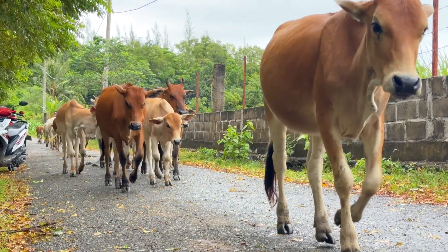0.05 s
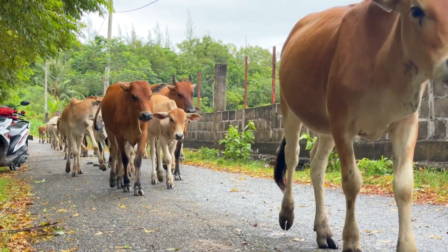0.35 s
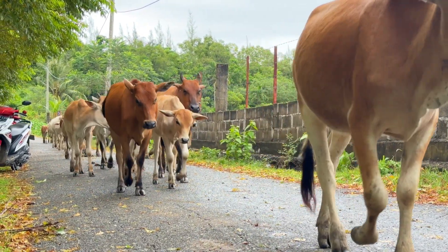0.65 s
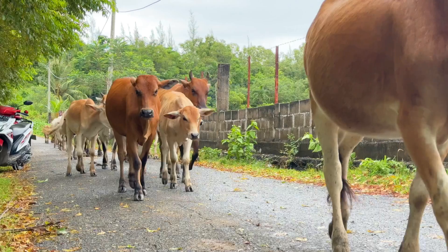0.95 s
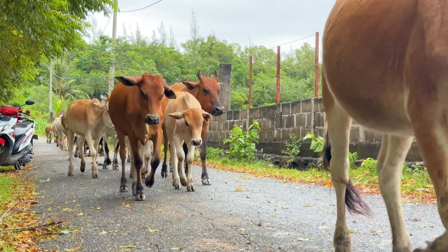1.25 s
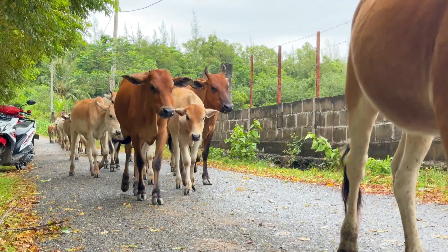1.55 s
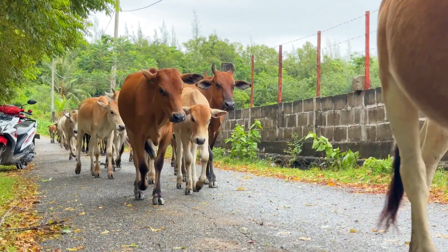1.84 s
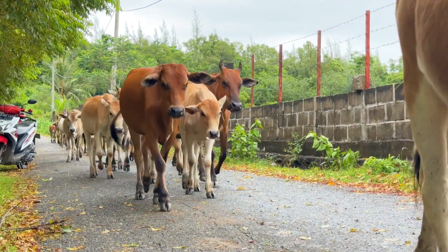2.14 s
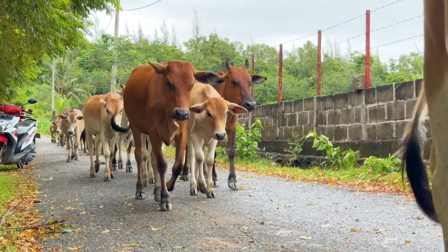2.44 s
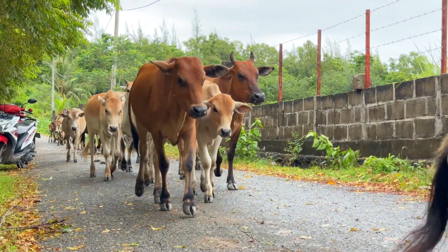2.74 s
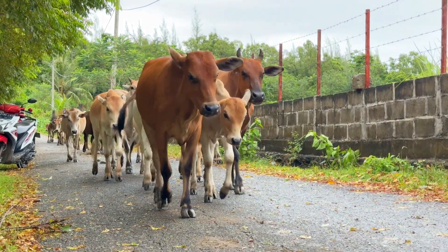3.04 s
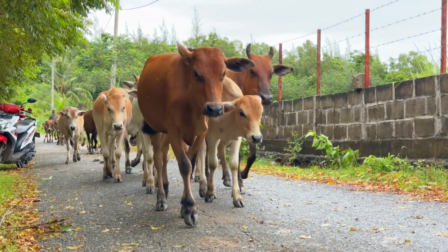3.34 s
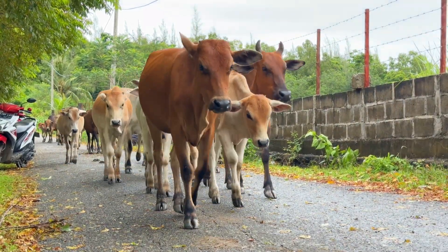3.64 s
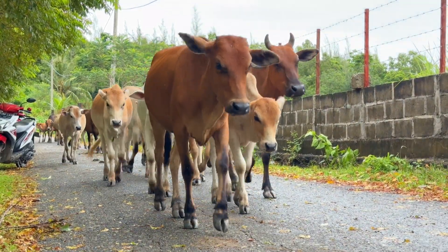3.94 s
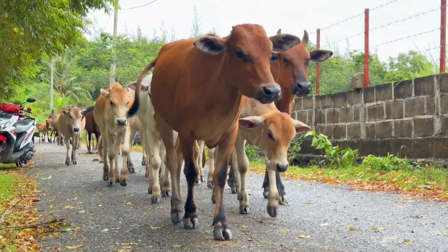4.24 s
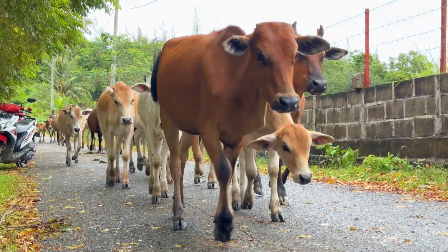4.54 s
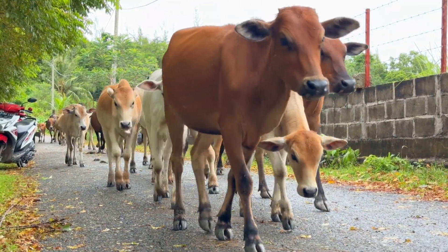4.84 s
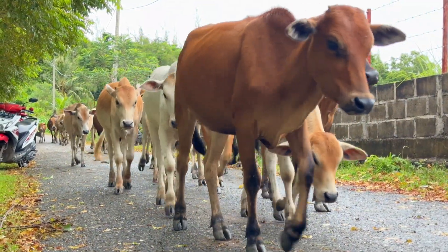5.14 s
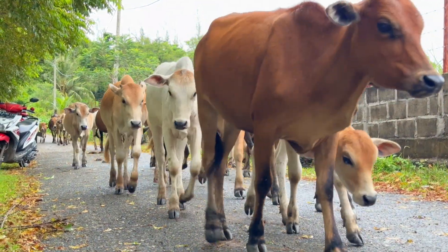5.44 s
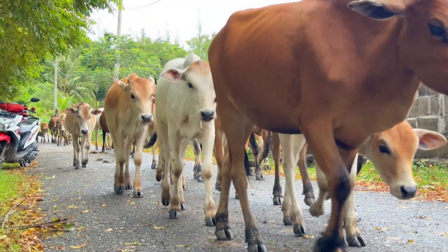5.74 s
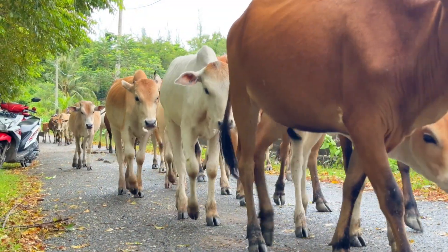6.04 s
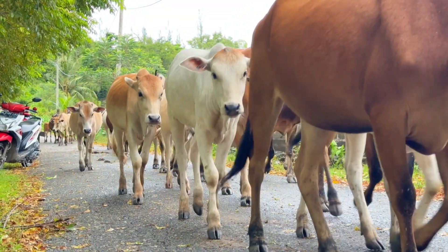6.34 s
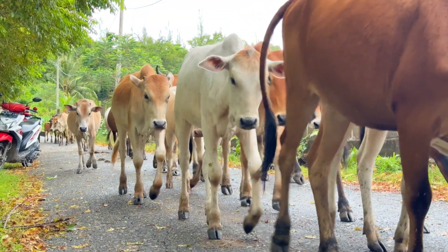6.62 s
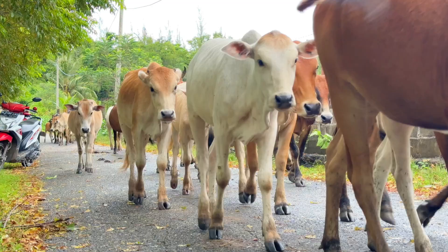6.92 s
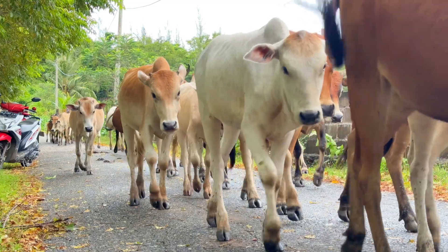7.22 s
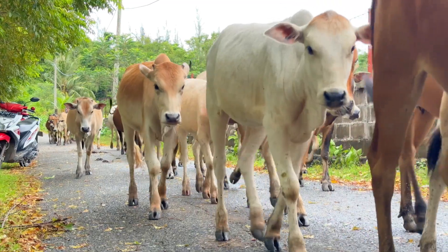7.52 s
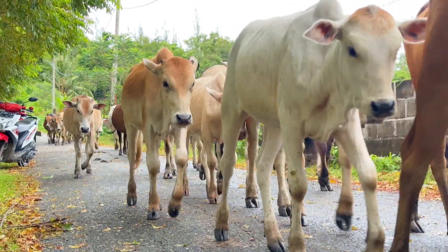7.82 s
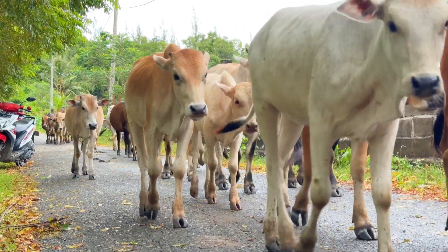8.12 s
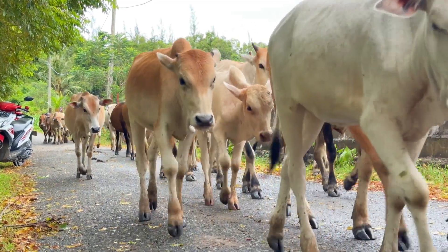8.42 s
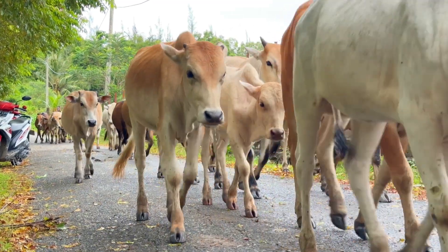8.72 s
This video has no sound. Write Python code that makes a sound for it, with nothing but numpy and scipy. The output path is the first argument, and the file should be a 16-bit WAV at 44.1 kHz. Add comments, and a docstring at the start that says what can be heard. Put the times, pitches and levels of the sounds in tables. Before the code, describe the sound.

A low moo and a brighter bawl from cattle, followed by high birdsong and faint hoofsteps outdoors.

```python
"""A country road between trees and a wall, heard from a stereo pair of microphones as cattle walk along.
Over low rumble and shuffled grit, a moo just to the right sinks from a hum to a growl while birds whistle.
A second moo opens into a bright bawl and ends in creaks; both are vocal folds ringing a changing throat.
Distant whistles, a thin trill and a low warble then carry through the echoing trees, and hooves tap softly.
Near the end a bird sings on the right and a cluster of steps knocks on the asphalt."""
import sys
import numpy as np
from scipy import signal
from scipy.fft import rfft, irfft
from scipy.io import wavfile
from scipy.ndimage import uniform_filter1d

SR = 44100
rng = np.random.default_rng(int(sys.argv[2]) if len(sys.argv) > 2 else 0)


def transcribe(signal):
    """Save signal, clipped to [-1, 1], as a 16-bit WAV file at the path in sys.argv[1]."""
    frames = np.atleast_2d(signal).T
    limited = np.clip(frames, -1, 1)
    pcm = np.round(limited * 32767).astype(np.int16)
    wavfile.write(sys.argv[1], SR, pcm)


N = 386757


def gain_of(db):
    """Decibels to amplitude."""
    return 10 ** (np.asarray(db) / 20)


def unit_rms(x):
    """Scales to rms 1."""
    return x / np.sqrt(np.mean(x ** 2) + 1e-20)


def spectrum_at(points, hz):
    """Reads a spectrum on a log-frequency axis."""
    f, value = np.transpose(points)
    return np.interp(np.log(hz + 1), np.log(f + 1), value)


def curves(rows, t):
    """Reads every column of a table at the times t."""
    s, *columns = np.transpose(rows)
    return [np.interp(t, s, c) for c in columns]


def add(mix, s, sound):
    """Adds a sound into the mix at time s."""
    part = mix[..., max(round(s * SR), 0):][..., :sound.shape[-1]]
    part += sound[..., :part.shape[-1]]


def wander(n, hz):
    """Smooth random drift of rms about 1, moving up to about hz times a second."""
    f = np.fft.rfftfreq(n + SR, 1 / SR)
    return unit_rms(irfft(rfft(rng.standard_normal(n + SR)) / (1 + (f / hz) ** 4)))[:n]


def ring(modes, size=8192):
    """Causal impulse response of a set of steep resonances."""
    f = np.fft.rfftfreq(size, 1 / SR)
    power = sum((gain_of(db) / (1 + (2 * (f - hz) / width) ** 2)) ** 2 for hz, width, db in modes)
    log_gain = np.log(power + 1e-10) / 2
    minimum_phase = np.exp(np.conj(signal.hilbert(np.r_[log_gain, log_gain[-2:0:-1]])))
    return np.fft.ifft(minimum_phase).real[:size // 4]


# Open air all round the microphones. Each row: frequency in Hz, relative spectral level in dB.
AIR_SPECTRUM = [(12, -45), (28, -23), (45, -8), (70, 1.5), (130, -4.5), (200, -12), (350, -20.5),
                (700, -24), (1400, -26.5), (2800, -28.5), (5500, -35), (8000, -40), (10000, -41),
                (15000, -48)]
# Each row: frequency in Hz, correlation between the left and right microphones.
AIR_LIKENESS = [(60, 1), (120, .96), (240, 0.65), (900, 0.68), (2000, .3), (4000, 0.18), (8000, -0.14)]

def air(db=-50.5, patchy_db=1.5, swell_db=-.04):
    """Low outdoor rumble and leaf hiss, drifting in patches."""
    frames, hz = N // 512 + 6, np.fft.rfftfreq(2048, 1 / SR)
    a, b, c, d, patches = rng.standard_normal((5, frames, len(hz)))
    patches = unit_rms(uniform_filter1d(uniform_filter1d(patches, size=8, axis=0), size=16, axis=1))
    likeness = spectrum_at(AIR_LIKENESS, hz)
    left = a + 1j * b
    right = likeness * left + np.sqrt(1 - likeness ** 2) * (c + 1j * d)
    gain = gain_of(spectrum_at(AIR_SPECTRUM, hz) + patchy_db * patches)
    spectra = np.array([left, right]) * gain / np.sqrt((1 + likeness) / 2 + 1e-3)
    noise = signal.istft(spectra.swapaxes(1, 2), nperseg=2048, noverlap=1536)[1][:, :N]
    return gain_of(db + swell_db * wander(N, .67)) * unit_rms(noise)


# Loose grit on the road. Each row: resonance in Hz, width in Hz, gain in dB.
GRIT_MODES = [(4000, 4500, -15.5), (9500, 7700, 8), (12900, 3100, 1.5)]

def scuffs(db=-75, nearing_db_per_s=.5, grains_per_s=700):
    """Many shuffling feet roll loose grit in clumps, louder as the herd nears the microphones."""
    t = np.arange(N) / SR
    clumps = gain_of(5 * np.minimum(wander(N, 9), 1.8))
    grains = (rng.random((2, N)) < grains_per_s / SR) * rng.standard_normal((2, N)) * clumps
    grit = signal.fftconvolve(grains, ring(GRIT_MODES)[None], axes=1)[:, :N]
    return gain_of(db + nearing_db_per_s * (t - t.mean())) * unit_rms(grit)


def moo(course, texture, mouth, jitter, slip_turns, flutter_hz, chest_db,
        shimmer=.6, smear_rad=.025, attack_s=.006, release_s=.015):
    """Pulses of the vocal folds and puffs of air ring a throat that changes posture."""
    t = np.arange(course[0][0], course[-1][0], 1 / SR)
    hz, db = curves(course, t)
    rough, flutter, hiss, reach_hz = curves(texture, t)
    sway = 2 * np.pi * flutter_hz * t + 1.5 * wander(len(t), 15)  # loose tissue flaps beside the folds
    turns = np.cumsum(hz * (1 + jitter * rough * wander(len(t), 61) + .044 * flutter * np.cos(sway))) / SR
    turns += slip_turns * rough * wander(len(t), 90)  # each closure comes a little early or late
    # soft folds close unevenly, so higher harmonics arrive later; above their reach only air is left
    folds = sum(np.cos(2 * np.pi * k * turns - smear_rad * k ** 2) / (1 + (k * hz / reach_hz) ** 8)
                for k in range(1, 56)) / 4
    folds *= np.exp(shimmer * rough * wander(len(t), 100)) * (1 + flutter * np.sin(sway))
    puffs = unit_rms((.7 + np.exp(-(turns % 1) / .25)) * rng.standard_normal(len(t)))
    drive = folds + hiss * puffs
    held_s = [s for start, end, _ in mouth for s in (start, end)]
    voice = 0
    for k, (_, _, throat) in enumerate(mouth):
        share = np.interp(t, held_s, np.repeat(np.arange(len(mouth)) == k, 2))
        voice += share * unit_rms(signal.fftconvolve(drive, ring(throat))[:len(t)])
    voice /= np.sqrt(uniform_filter1d(uniform_filter1d(voice ** 2, size=1100), size=700) + 1e-9)
    # the fundamental leaves through the neck
    voice += gain_of(chest_db) * (hz / hz.max()) ** 4 * np.sin(2 * np.pi * turns)
    gate = np.clip(np.minimum((t - t[0]) / attack_s, (t[-1] - t) / release_s), 0, 1)
    out = np.zeros(N)
    add(out, t[0], gate * gain_of(db) * voice)
    return out


# The throat in four postures. Each row: resonance in Hz, width in Hz, gain in dB.
HUM = [(293, 60.6, 1.5), (657, 148, -9), (940, 150, -12), (1137, 60, -5), (1350, 200, -20),
       (1680, 290, -25), (2164, 570, -28), (4000, 3100, -44), (11000, 4800, -46)]
STRAINED = [(293, 60, 1.5), (640, 148, -8), (935, 130, -12), (1170, 220, -15), (1410, 130, -10),
            (1600, 200, -22), (2200, 650, -24), (4000, 3100, -43), (11000, 4800, -46)]
GROWL = [(250, 62, 2), (654, 114, -2), (950, 240, -18), (1251, 136, -9.5), (1590, 170, -16.5),
         (1960, 157, -19), (2490, 400, -30), (3800, 4500, -42)]
AGAPE = [(240, 65, 0), (605, 130, 0), (965, 150, -9), (1250, 130, -4), (1530, 200, -10), (1920, 150, -10),
         (2500, 500, -22), (3800, 3100, -42)]
# Each row: start and end in seconds, posture held.
FIRST_MOUTH = [(0, .17, HUM), (.34, .455, STRAINED), (.505, .57, GROWL), (.615, .67, AGAPE),
               (.72, .85, GROWL)]
# Each row: time in seconds, pitch in Hz, effort in dB.
FIRST_COURSE = [(0.0, 164.4, -22), (0.098, 160.8, -22), (0.228, 160.4, -20), (0.336, 158.6, -20),
                (0.448, 149.4, -19), (0.48, 142.6, -17), (0.582, 126.3, -20), (0.646, 111.4, -23),
                (0.704, 92.0, -21), (0.735, 87.8, -22), (0.755, 86, -31), (0.78, 80, -31), (0.792, 78, -42),
                (0.835, 72, -47)]
# The folds turn rough as they start, strain and slacken. Each row: time in seconds,
# roughness and flutter depth from 0 to 1, strength of rushing air, reach of the harmonics in Hz.
FIRST_FOLDS = [(0, 1, .5, 2.6, 1300), (.035, 1, .5, 2.4, 1300), (.06, .12, .08, .55, 2000),
               (.3, .11, .08, .55, 2300), (.4, .25, .2, .85, 2200), (.49, .09, 0, .35, 1900),
               (.57, .1, 0, .4, 2100), (.7, .25, .1, .7, 3000), (.835, .7, .3, .9, 900)]

def first_moo():
    """A hum sinks to a growl as the folds slacken."""
    return moo(FIRST_COURSE, FIRST_FOLDS, FIRST_MOUTH,
               jitter=.035, slip_turns=.05, flutter_hz=46, chest_db=-8.5)


# The trees along the road. Each row: frequency in Hz, seconds to die away by 60 dB.
TREE_DECAY = [(200, 0.25), (1500, 0.28), (3500, 1), (5500, 0.72), (8000, 0.5), (14000, 0.45)]

def echoes(x, early_db, early_s, late_db):
    """Scatter from the wall and nearby leaves, then a longer tail from the trees."""
    t = np.arange(SR) / SR
    taps = rng.standard_normal((2, SR)) * (rng.random((2, SR)) < .08) * (t > .005)
    hz, frame_s, spectra = signal.stft(taps, SR, nperseg=256)
    decay = gain_of(-60 * frame_s / spectrum_at(TREE_DECAY, hz)[:, None])
    late = signal.istft(spectra * decay, SR, nperseg=256)[1][:, :SR]
    early = rng.standard_normal((2, SR)) * (rng.random((2, SR)) < .03) * (t > .003) * np.exp(-t / early_s)
    tail = (gain_of(early_db) * unit_rms(early) + gain_of(late_db) * unit_rms(late)) / np.sqrt(SR)
    return signal.fftconvolve(x[None], tail, axes=1)[:, :N]


# The moos at the microphones. Each row: frequency in Hz, left minus right level in dB.
MOO_BALANCE = [(60, -17), (120, -4), (370, -5.5), (690, -8.5), (1260, -14), (2330, -15), (4300, -8.5),
               (9000, -9.5)]

def cattle(voices):
    """Sets the voices a little to the right, with a faint slap from the roadside."""
    hz = np.fft.rfftfreq(N, 1 / SR)
    side = gain_of(spectrum_at(MOO_BALANCE, hz))
    left = side * np.exp(1j * np.minimum(hz / 2800, 3))
    pair = np.array([left, np.ones(len(hz))]) * 2 / (1 + side)
    return irfft(rfft(voices) * pair, N) + echoes(voices, early_db=-14, early_s=.016, late_db=-36)


def whistle(length_s, start_hz, middle_hz, end_hz, change_db, waver, flicker=3.1, attack_s=.006):
    """One unsteady glide of the syrinx, never twice quite alike, as an analytic signal."""
    u = np.linspace(0, 1, int(length_s * SR))
    bend, tremor = uniform_filter1d(uniform_filter1d(rng.standard_normal((2, len(u))), size=90), size=60)
    glide_hz = np.polyval(np.polyfit([0, .5, 1], [start_hz, middle_hz, end_hz], 2), u)
    hz = glide_hz * (1 + waver * bend + .003 * rng.standard_normal())
    gate = np.sin(np.pi / 2 * np.clip(np.minimum(u * length_s / attack_s, (1 - u) / .3), 0, 1)) ** 2
    strength = gate * gain_of(change_db * (u - .5)) * np.exp(flicker * tremor)
    return strength * np.exp(2j * np.pi * np.cumsum(hz) / SR)


def leaves(sound):
    """Leaves round the perch blur every note in a different way."""
    t = np.arange(1200) / SR
    taps = .6 * unit_rms(rng.standard_normal(len(t)) * np.exp(-t / .012)) / np.sqrt(len(t))
    blurred = signal.fftconvolve(sound, taps + (t == 0))
    return blurred * np.linalg.norm(sound) / np.linalg.norm(blurred)


# Bird syllables. Each holds: length in seconds, start, middle and end pitch in Hz, level change in dB.
SWOOP = (.052, 4750, 5800, 7150, 2)
PEEP = (.075, 6900, 6960, 6900, -2)
TICK = (.025, 5600, 4600, 4000, 2)
SEEP = (.18, 7366, 7046, 7140, -5)
SLUR = (.076, 5480, 4980, 3650, 7)
LIFT = (.036, 5650, 6350, 6600, 5)
TINK = (.026, 6300, 6020, 5650, 2)
CHIP = (.031, 4980, 4780, 3920, 1)
PIP = (.04, 5220, 5130, 5100, -3)
TOO = (.04, 4400, 4440, 4620, 10)
WHIT = (.036, 4680, 5150, 6200, 0)
DROP = (.045, 4650, 4080, 3850, 0)
CHEW = (.058, 6080, 4480, 3930, -5)
TSEE = (.1, 8050, 7650, 7400, 0)
ZEE = (.09, 6800, 6740, 6700, 5)
ZIP = (.045, 6390, 6500, 6700, 0)
SINK = (.13, 8600, 8400, 7400, -20)
WHEEP = (.1, 3000, 3480, 3850, 9)
COO = (.105, 1990, 1965, 2090, 2)
PEW = (.23, 2610, 2480, 2244, 0)
MOAN = (.13, 980, 945, 880, 0)
HOO = (.16, 3005, 2900, 3080, 0)

def birds(notes, left_db, early_db, late_db, waver=.06, left_lead_rad=-2.24, direct_db=.5, early_s=.042):
    """Notes reach the two microphones directly and scattered by the trees."""
    song = np.zeros(N, complex)
    for syllable, s, db in notes:
        add(song, s, gain_of(db) * leaves(whistle(*syllable, waver)))
    side = gain_of(left_db)
    direct = np.array([song * side * np.exp(1j * left_lead_rad), song]).real * np.sqrt(2 / (1 + side ** 2))
    return gain_of(direct_db) * direct + echoes(song.real, early_db, early_s, late_db)


# Each row: syllable, start in seconds, relative level in dB.
NEAR_CALLS = [(SEEP, 0, -36), (PEEP, 0, -33), (SEEP, .62, -29), (SINK, 5.236, -48), (SINK, 5.422, -50),
              (DROP, 6.02, -52), (DROP, 6.47, -55), (TSEE, 6.6, -47), (ZEE, 7.168, -29.5),
              (TSEE, 8.36, -50), (TICK, 8.416, -28), (ZEE, 8.678, -26), (ZIP, 8.721, -23)]

def near_calls():
    """Single high calls from the nearby trees, almost straight ahead."""
    return birds(NEAR_CALLS, left_db=-2, early_db=-3, late_db=-7, waver=.08)


def phrase(runs):
    """Each syllable repeats at an even pace while it swells or fades."""
    return [(syllable, first_s + k * gap_s, db)
            for syllable, first_s, count, gap_s, first_db, last_db in runs
            for k, db in enumerate(np.linspace(first_db, last_db, count))]


# Each row: syllable, start in seconds, note count, spacing in seconds, first and last relative level in dB.
SWOOPING_RUNS = [(SWOOP, .068, 3, .204, -24, -24), (PEEP, .114, 3, .204, -22, -24),
                 (TICK, .017, 9, .0623, -27, -23.5)]

def swooping_bird():
    """Upward swoops, peeps and quick ticks, close by and just left of centre."""
    return birds(phrase(SWOOPING_RUNS), left_db=2, early_db=-4, late_db=-6)


# Each row: syllable, start in seconds, note count, spacing in seconds, first and last relative level in dB.
SEESAW_RUNS = [(SLUR, .866, 1, 0, -18, -18), (LIFT, .964, 5, .1305, -30, -23),
               (TINK, 1.0, 5, .1305, -20, -19), (CHIP, 1.026, 4, .1295, -15, -17),
               (PIP, 1.426, 2, .116, -26, -21)]

def seesaw_bird():
    """Rising and falling notes alternate, close by on the right."""
    return birds(phrase(SEESAW_RUNS), left_db=-5, early_db=-6.5, late_db=-9, direct_db=1)


# The throat as the mouth opens and shuts. Each row: resonance in Hz, width in Hz, gain in dB.
NASAL = [(165, 100, 0), (365, 110, -1), (775, 130, 1.5), (1080, 400, -7), (1950, 500, -17),
         (2425, 170, -7.5), (3310, 1100, -14)]
PARTING = [(140, 150, -7), (345, 77, 2), (700, 80, 1.5), (980, 420, -8), (1800, 700, -19), (2500, 170, -10),
           (3500, 1000, -16)]
OPEN = [(375, 79, -2), (804, 95, -10), (1057, 180, -12.5), (1290, 240, -21.5), (1632, 80, -4),
        (1780, 260, -13), (2082, 120, -8), (2870, 110, -14), (3450, 610, -20), (4700, 1200, -32),
        (11500, 7200, -37)]
BAWL = [(398, 88, 2.5), (796, 120, -9), (986, 170, -9), (1360, 260, -16.5), (1775, 175, 0.5),
        (2127, 88, -3.5), (2840, 130, -14), (3430, 270, -15.5), (4700, 3500, -35), (11500, 11000, -35)]
WIDE = [(406, 114, 1), (927, 163, -7), (1420, 94, -7.5), (1826, 120, 5.5), (2126, 77, 1.5),
        (2930, 250, -11.5), (3500, 210, -9), (4700, 2600, -28.5), (11500, 6300, -37)]
SHUT = [(383, 74, 0.5), (800, 370, -25), (1060, 140, -15.5), (1480, 210, -24), (1920, 110, -21),
        (2350, 490, -26), (2930, 130, -23), (3600, 500, -29), (4600, 620, -29), (6270, 2100, -28),
        (12500, 6600, -44)]
# Each row: start and end in seconds, posture held.
SECOND_MOUTH = [(1.25, 1.335, NASAL), (1.385, 1.406, PARTING), (1.414, 1.726, OPEN), (1.752, 1.825, BAWL),
                (1.994, 2.025, WIDE), (2.08, 2.353, SHUT)]
# Each row: time in seconds, pitch in Hz, effort in dB.
SECOND_COURSE = [(1.258, 76, -43), (1.28, 81, -41), (1.305, 90, -31), (1.36, 110, -30), (1.4, 117, -25),
                 (1.416, 119.5, -20.5), (1.464, 121.2, -19.5), (1.63, 125.6, -18.5), (1.76, 126.5, -18.5),
                 (1.954, 119.2, -20), (1.978, 116.1, -20), (2.022, 107.6, -22), (2.05, 102, -29),
                 (2.12, 100, -30), (2.185, 99, -37), (2.2, 99, -29), (2.285, 93, -32), (2.31, 91, -39),
                 (2.35, 87, -45)]
# Each row: time in seconds, roughness, flutter depth, strength of rushing air, harmonic reach in Hz.
SECOND_FOLDS = [(1.258, .5, 0, .9, 3500), (1.39, .12, 0, .6, 3800), (1.45, .07, 0, .26, 4600),
                (1.7, .07, 0, .26, 4600), (1.74, .2, 0, .5, 4400), (1.8, .08, 0, .26, 4400),
                (1.96, .15, 0, .35, 4200), (2.06, 1, .4, 2, 1300), (2.17, 1, .4, 2, 600),
                (2.2, .3, .15, 1.3, 480), (2.35, .8, .4, 1.5, 480)]

def second_moo():
    """A nasal tone opens into a bright bawl, then turns rough as the mouth shuts."""
    return moo(SECOND_COURSE, SECOND_FOLDS, SECOND_MOUTH,
               jitter=.06, slip_turns=.03, flutter_hz=58, chest_db=-25)


# Strain late in the second moo. Each row: time in seconds, level in dB.
RASP_LEVEL = [(1.75, -100), (1.82, -42), (2.0, -35), (2.04, -44), (2.1, -100)]
# Each row: resonance in Hz, width in Hz, gain in dB.
RASP_MODES = [(3000, 250, -4), (3500, 480, 0)]

def rasp():
    """Strained air scrapes through the throat once in every cycle of the folds."""
    t = np.arange(N) / SR
    turns = np.cumsum(curves(SECOND_COURSE, t)[0]) / SR
    puffs = (.3 + np.exp(-(turns % 1) / .25)) * rng.standard_normal(N)
    scrape = unit_rms(signal.fftconvolve(puffs, ring(RASP_MODES))[:N])
    return gain_of(curves(RASP_LEVEL, t)[0]) * scrape


# The end of the second moo. Each row: start in seconds, peak level at the mouth in dB.
CREAK_TIMES = [(2.038, -18), (2.059, -24), (2.078, -21), (2.12, -22), (2.232, -32), (2.279, -31),
               (2.339, -37)]
SMACK_TIMES = [(2.05, -31), (2.077, -30), (2.148, -27), (2.227, -41), (2.272, -42)]
# Each row: resonance in Hz, width in Hz, gain in dB.
CREAK_MODES = [(420, 150, -4), (1000, 200, 0), (1500, 200, -11), (1890, 140, -1), (3200, 700, -14)]
SMACK_MODES = [(5600, 1200, -3), (7000, 1000, 0)]

def creaks_and_smacks():
    """The voice frays into creaks and wet clicks: very short bursts of noise ring resonances."""
    out, t = np.zeros(N), np.arange(2048) / SR
    for rows, modes, fade_s in (CREAK_TIMES, CREAK_MODES, .003), (SMACK_TIMES, SMACK_MODES, .0012):
        for s, db in rows:
            snap = signal.fftconvolve(rng.standard_normal(len(t)) * np.exp(-t / fade_s), ring(modes))
            add(out, s, gain_of(db) * snap / abs(snap).max())
    return out


def chorus(start_s, end_s, low_hz, high_hz, db, count):
    """Faint random notes of birds far off in the wood."""
    notes = []
    for when, height, slope, length, softness in rng.random((count, 5)):
        hz, glide = low_hz + height * (high_hz - low_hz), .11 * (slope - .5)
        syllable = (.05 + .12 * length, hz * (1 - glide), hz, hz * (1 + glide), 0)
        notes.append((syllable, start_s + when * (end_s - start_s), db - 8 * softness))
    return notes


# A thin trill that climbs and swells. Each row: time in seconds, mid-note pitch in Hz, relative level in dB.
TRILL_COURSE = [(3.92, 7470, -63), (4.25, 7250, -57), (4.7, 7450, -53), (5.2, 7850, -50)]

def far_wood(gap_s=.122, note_s=.06, fall_hz=650):
    """A chorus and one trill of short falling notes, so far off that they are mostly echo."""
    times = np.arange(TRILL_COURSE[0][0], TRILL_COURSE[-1][0], gap_s)
    notes = [((note_s, hz + fall_hz / 2, hz, hz - fall_hz, 0), s, db)
             for s, hz, db in zip(times, *curves(TRILL_COURSE, times))]
    notes += chorus(2.0, 5.0, 2650, 3500, db=-60, count=45)
    notes += chorus(2.2, 6.4, 3500, 7400, db=-71, count=80)
    return birds(notes, left_db=2, early_db=-2, late_db=-.5,
                 waver=.08, left_lead_rad=-2.1, direct_db=-6, early_s=.11)


# Each row: syllable, start in seconds, relative level in dB.
DISTANT_CALLS = [(WHEEP, 2.295, -44), (COO, 2.303, -35), (WHEEP, 2.847, -40), (WHEEP, 3.395, -60),
                 (PEW, 4.89, -55), (MOAN, 5.02, -61), (HOO, 8.221, -56)]

def distant_calls():
    """Lower whistles from a distance, well to the left."""
    return birds(DISTANT_CALLS, left_db=12, early_db=0, late_db=-6.5,
                 waver=.07, left_lead_rad=.53, direct_db=1.5, early_s=.047)


# Steps on the road. Each row: start in seconds, relative grit and knock levels in dB, drag fade in seconds.
HOOF_STEPS = [(2.9728, -41, -64, .035), (3.7226, -54, -56, .04), (4.4947, -46, -64, .02),
              (5.2426, -53, -64, .01), (6.0762, -50, -63, .008), (6.4848, -46, -68, .008),
              (7.7189, -46, -44, .015), (7.7578, -38, -58, .012), (7.8074, -62, -47, .02),
              (7.8292, -53, -57, .02), (7.8974, -62, -52, .02), (8.0043, -50, -61, .05),
              (8.392, -53, -55, .05)]
# Hoof on asphalt. Each row: resonance in Hz, width in Hz, gain in dB.
KNOCK_MODES = [(450, 530, -6), (955, 700, -13), (2400, 1500, -24.5)]

def hooves(grit_gain_db=6, knock_gain_db=3, drag_db=-15, herd_db=-60, count=70):
    """Each hoof knocks, crunches grit and drags a little; the rest of the herd patters behind."""
    out, t = np.zeros((2, N)), np.arange(8000) / SR
    herd = [(when * N / SR, herd_db - 8 * softness, herd_db - 8 - 8 * softness, .05 * drag + .008)
            for when, softness, drag in rng.random((count, 3))]
    for s, grit_db, knock_db, drag_s in list(HOOF_STEPS) + herd:
        crunch = np.exp(-t / .002) + gain_of(drag_db) * np.exp(-t / drag_s)
        grains = rng.standard_normal((2, len(t))) ** 3 * crunch
        grit = signal.fftconvolve(grains, ring(GRIT_MODES)[None], axes=1)
        knock = signal.fftconvolve(rng.standard_normal(len(t)) * np.exp(-t / .0098), ring(KNOCK_MODES))
        add(out, s, gain_of(grit_db + grit_gain_db) * grit / abs(grit).max())
        add(out, s, gain_of(knock_db + knock_gain_db) * knock / abs(knock).max())
    return out


def warble(start_s=5.277, length_s=.168, pitch_hz=1730, db=-31.5, rate_hz=46, swing_hz=110):
    """A low bird note, a little to the left, swells and fades while its pitch shakes fast."""
    t = np.arange(0, length_s, 1 / SR)
    hz = pitch_hz + swing_hz * np.sin(2 * np.pi * rate_hz * t) + 35 * wander(len(t), 83)
    call = np.zeros(N)
    add(call, start_s, gain_of(db) * np.hanning(len(t)) * np.sin(2 * np.pi * np.cumsum(hz) / SR))
    return call * gain_of([[0], [-3]]) + echoes(call, early_db=-2, early_s=.02, late_db=-13)


# Each row: syllable, start in seconds, note count, spacing in seconds, first and last relative level in dB.
ROLLING_RUNS = [(TINK, 6.16, 2, .186, -48, -42), (PIP, 6.243, 2, .18, -53, -45),
                (TOO, 6.762, 2, .207, -39, -20), (WHIT, 6.802, 2, .198, -31, -24),
                (DROP, 6.872, 2, .2, -41, -39), (CHEW, 7.281, 4, .1194, -31, -28),
                (CHEW, 7.758, 1, 0, -25, -25), (CHEW, 7.878, 3, .1194, -28, -22.5)]

def rolling_bird():
    """A song nearby on the right starts faintly and ends in a roll of falling notes."""
    return birds(phrase(ROLLING_RUNS), left_db=-7, early_db=-6.5, late_db=-6, early_s=.055)


def scene():
    """From the roadside: cattle in front, birds all round, hooves and air beneath."""
    birdsong = swooping_bird() + seesaw_bird() + rolling_bird()
    birdsong += near_calls() + distant_calls() + far_wood()
    voices = first_moo() + second_moo() + rasp() + creaks_and_smacks()
    return birdsong + cattle(voices) + warble() + hooves() + scuffs() + air()


def record(dry, edge_hz=15500):
    """The recorder's band limit cuts the highest treble from both microphones."""
    lowpass = signal.firwin(511, edge_hz, window=("kaiser", 9), fs=SR)
    return signal.oaconvolve(dry, lowpass[None], "same")


dry = scene()
out = record(dry)
transcribe(out)
```